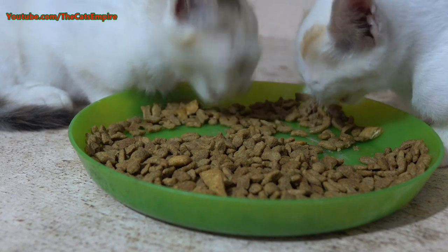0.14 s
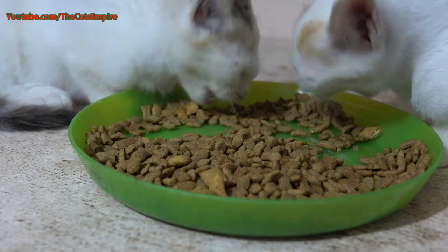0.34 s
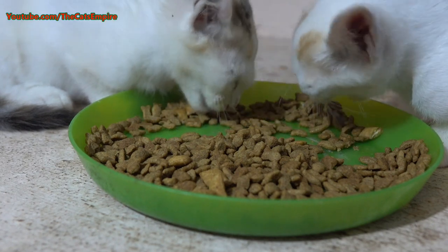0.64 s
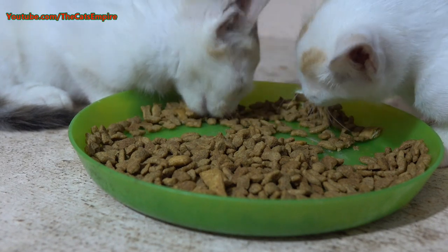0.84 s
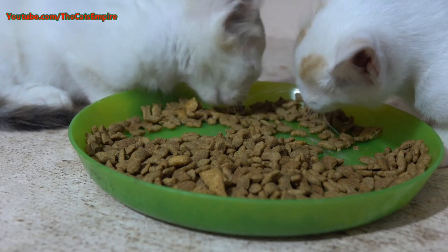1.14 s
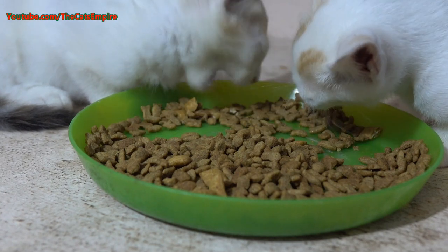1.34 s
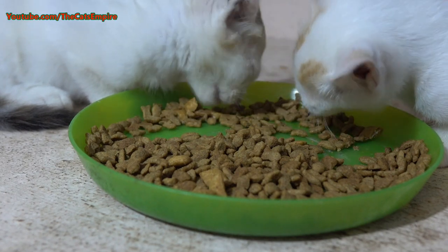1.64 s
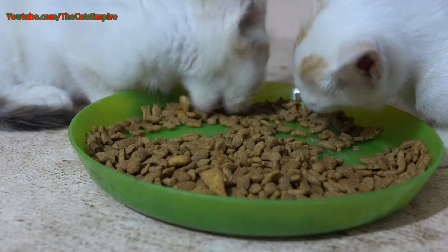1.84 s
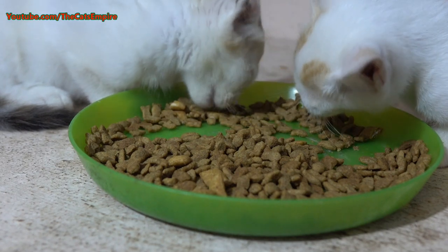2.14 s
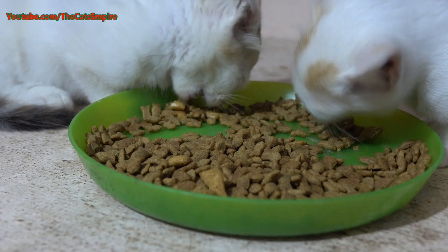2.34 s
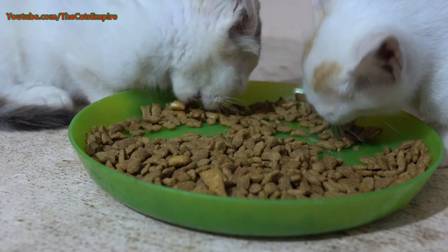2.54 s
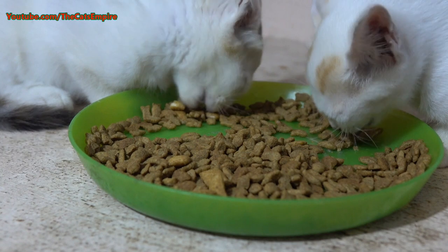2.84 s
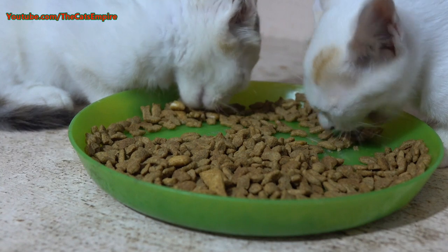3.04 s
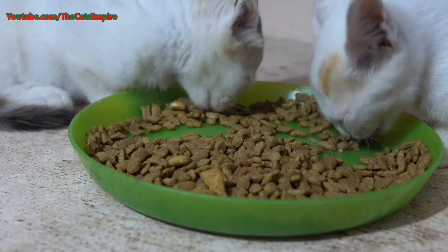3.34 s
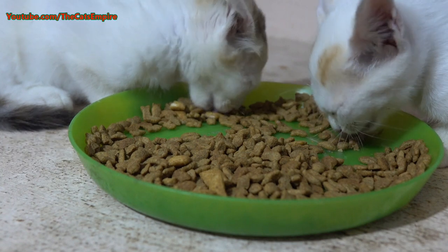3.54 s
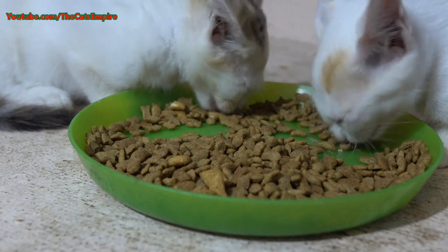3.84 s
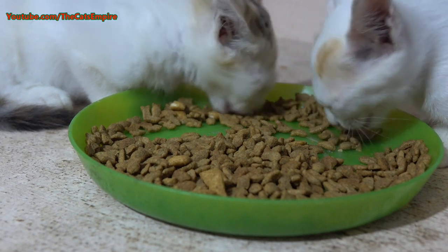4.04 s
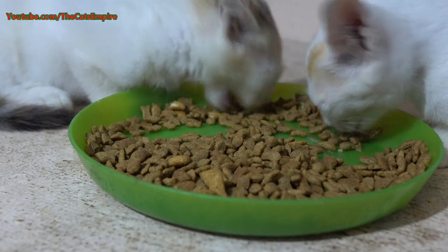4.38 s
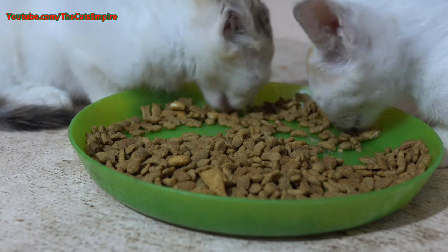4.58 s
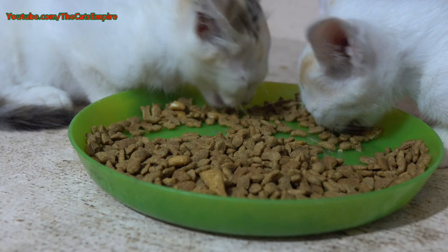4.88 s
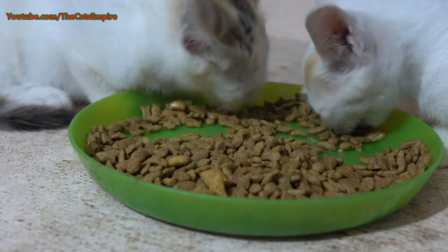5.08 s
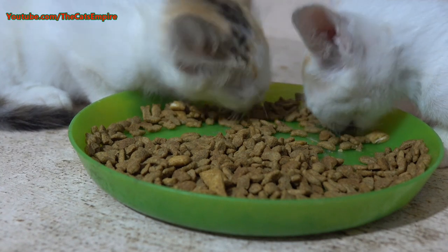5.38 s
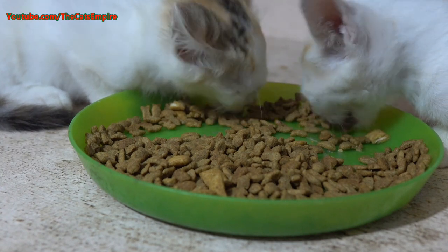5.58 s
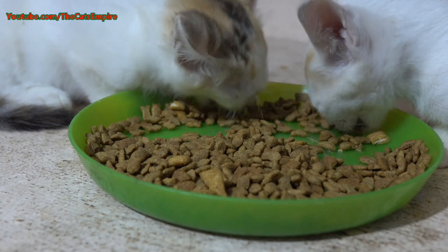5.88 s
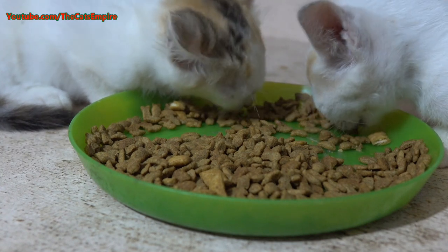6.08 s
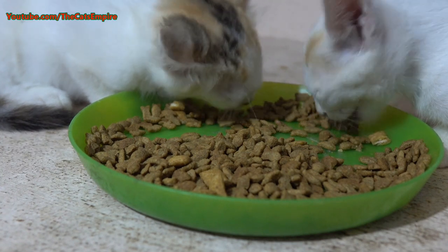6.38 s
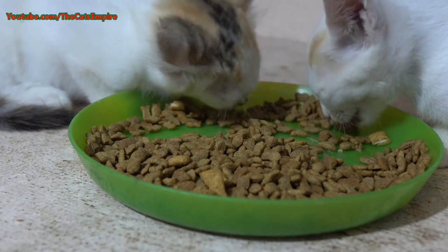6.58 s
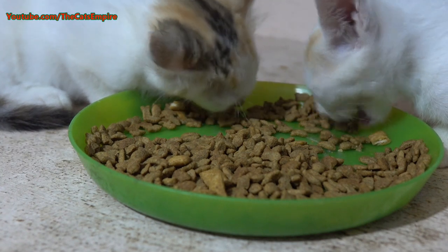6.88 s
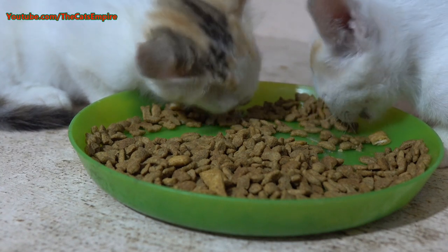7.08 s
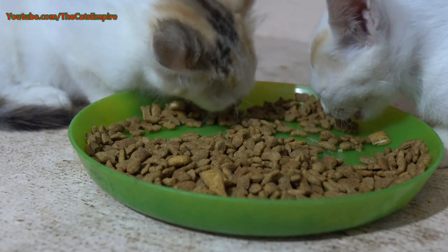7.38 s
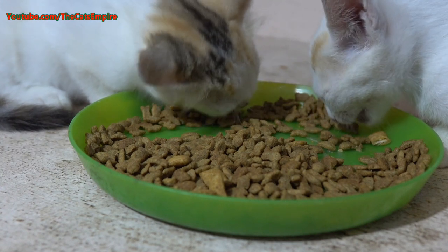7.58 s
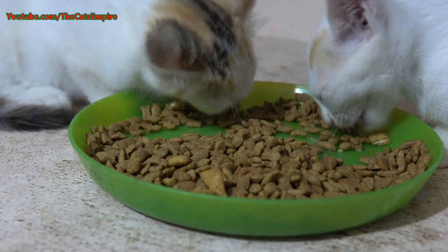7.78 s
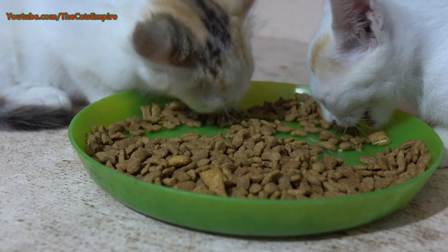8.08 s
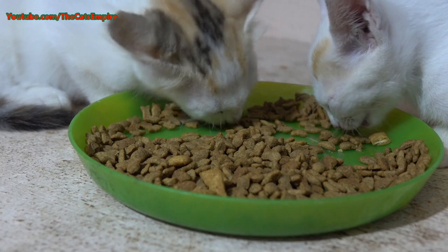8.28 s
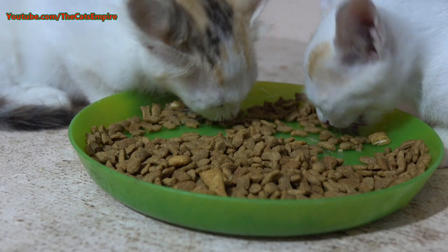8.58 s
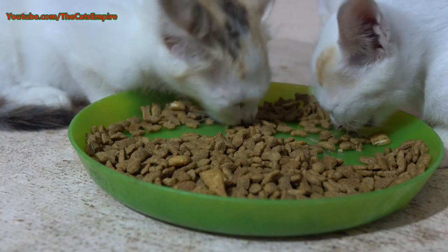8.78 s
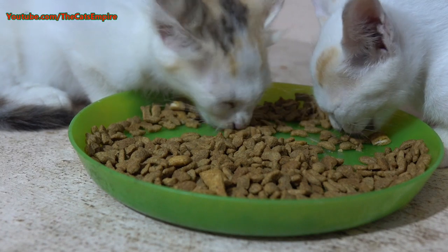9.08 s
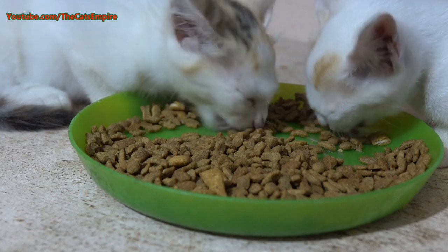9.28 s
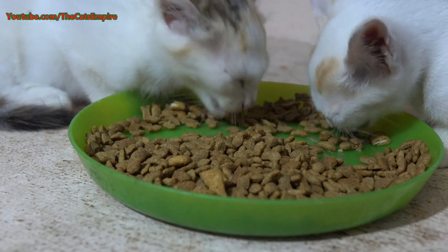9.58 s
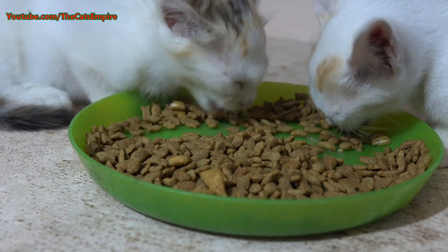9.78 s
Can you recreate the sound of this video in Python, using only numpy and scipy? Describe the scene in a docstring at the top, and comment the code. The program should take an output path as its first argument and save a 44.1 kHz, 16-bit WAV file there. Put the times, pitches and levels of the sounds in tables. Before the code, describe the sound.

Two kittens crunch dry pellets from a plastic plate very close up, brittle snaps and gritty chewing thinning out, then thickening at the end.

```python
"""Two kittens eat dry food from a plastic plate on a hard floor, close to the microphone.
From the start, chewing strokes grind crumbs as clumps of tiny ringing grains, lips smack in the treble,
bites set the plate's modes ringing and pellets snap as noise bursts that ring the mouth, over quiet room air.
Loud crunching thins out after three seconds; soft sagging bumps come from four seconds on; lone hard
snaps follow, then the densest crackle in the last second. A small hard room answers; peaks overload."""
import sys
import numpy as np
from scipy import signal
from scipy.fft import rfft, irfft
from scipy.io import wavfile

SR = 44100
rng = np.random.default_rng(int(sys.argv[2]) if len(sys.argv) > 2 else 0)


def unload_audio(sound):
    """Save the sound as a 16-bit wav file, at the path given as the first command line argument."""
    columns = np.transpose(np.atleast_2d(sound))
    # keep every value between -1 and 1, then stretch to whole-number steps
    steps = np.round(np.clip(columns, -1, 1) * 32767)
    wavfile.write(sys.argv[1], SR, steps.astype(np.int16))


def to_linear_factor(level_db):
    """Convert decibel levels (scalar or array-like) to linear amplitude factors."""
    exponent = np.asarray(level_db, float) / 20
    return 10 ** exponent


N = 437472   # samples

# Pellets that snap between the teeth. Each row: start in seconds, peak of the middle band in dB (before the
# mouth's colour), mouth ring in Hz, hollow body and treble in dB relative to the middle band.
SNAPS = [(0.067, -25, 3930, -25.5, -6), (0.096, -15, 1910, -17, 9), (0.13, -18, 6370, -38, 9.5),
         (0.18, -6, 3630, -4, -4), (0.202, 4, 3700, -5.5, 3.5), (0.2768, -13.5, 3380, -23, -21.5),
         (0.298, -5.5, 3500, -6.5, 0.5), (0.329, 2, 3500, -11.5, -2), (0.352, 3.5, 2200, -6, 5),
         (0.591, -25.5, 3950, -36, -0.5), (0.605, -10, 4530, -21, -7.5), (0.643, -12, 1204, -35, -35),
         (0.699, -16, 3950, 3.5, 0), (0.959, -17.5, 1830, -33.5, -24), (1.0081, 1.5, 3043, -7.5, -3.5),
         (1.03, -17, 3560, -20, -26), (1.221, -20.5, 3350, -23, -22.5), (1.235, -29.5, 3620, 4, -29.5),
         (1.264, -19.5, 3800, -1.5, 2.5), (1.286, -13.5, 3260, 0.5, 2.5), (1.332, -13.5, 1800, 0, -38.5),
         (1.37, 3.5, 3130, -7, 4), (1.421, -7, 3300, -0.5, 2), (1.484, 7, 3756, -15.5, -3.5),
         (1.494, -20, 3800, -15, 1.5), (1.674, -19.5, 5300, -1.5, -17), (1.7875, -6.5, 1180, -29, -7.5),
         (1.805, -8.5, 1300, -28.5, 2), (1.8164, -8, 1690, -19.5, -16.5), (1.83, -6, 3520, 5, 8),
         (1.882, -5, 2970, -4, 0.5), (1.89, -6.5, 3700, -31, -1), (1.91, 5, 3660, -11, -12.5),
         (2.056, -26, 3340, -8.5, -8), (2.106, -19.5, 1970, -26.5, 9.5), (2.135, -13, 4670, -5, -1),
         (2.151, -23, 3500, 1.5, -23), (2.186, -12.5, 2300, 3, -25), (2.241, 8, 3960, -10.5, -19.5),
         (2.2533, 5, 4130, -12.5, 0), (2.394, -18.5, 1980, -11.5, -15.5), (2.468, -16, 4170, -56, -5),
         (2.519, -22.5, 4870, -9, -0.5), (2.561, -25.5, 3840, -43, -12), (2.624, -28.5, 3400, -19, -16.5),
         (2.653, -21.5, 1820, 7, -4), (2.663, 2, 2950, -11.5, -2.5), (2.742, -8.5, 5240, 0, -33.5),
         (2.766, -13, 810, -29.5, -28.5), (2.784, -7, 3250, -0.5, 0), (2.9328, -12.5, 4330, -23.5, -16.5),
         (2.968, -11.5, 3060, -13, -23.5), (3.043, -6.5, 2910, 0, -18.5), (3.079, -16.5, 2760, -26, -21),
         (3.099, -20.5, 3080, -14, 5.5), (3.2308, 4.5, 2700, -3.5, 2.5), (3.328, -16.5, 3000, 0, 6.5),
         (3.477, -18.5, 3400, -21, -2), (3.494, -25, 4370, -8, 0.5), (3.524, -29, 2330, 0, -25),
         (3.584, -18, 4180, -12, -20.5), (3.594, -9.5, 4570, -6.5, -3), (3.634, -26, 3930, -33, 5),
         (3.713, -24, 4720, -41, -11), (3.735, -23, 4300, -5, -25), (3.763, -25, 4900, -3, -1),
         (3.7948, -23.5, 4460, -11, -3), (3.9211, -17, 4700, -17, -27), (3.972, -22, 2180, -28, -2),
         (4.055, -24.5, 3070, -3, -40.5), (4.138, -27.5, 2270, -25.5, -3), (4.184, -13, 934, -16, -36.5),
         (4.203, -26, 4800, -30, -23.5), (4.301, -18.5, 6440, -16, -15), (4.3133, -10.5, 6800, -9, -9),
         (4.327, -19.5, 2250, -31, 2), (4.757, -29, 1020, -15, -28), (4.901, -24, 5220, -39.5, -41),
         (4.955, -24.5, 3900, -6, -17.5), (4.977, -26.5, 4830, -12, -35), (5.162, -23.5, 2380, -6, -21),
         (5.215, -25.5, 3340, -11, -22), (5.224, -22, 3360, 5.5, -5), (5.258, -21, 2900, -25.5, -13.5),
         (5.266, -16, 1260, -44, -22), (5.291, -18.5, 6100, -43, -16.5), (5.358, -25.5, 3500, -5, -18.5),
         (5.543, -1, 3930, -6.5, -36), (5.563, -11, 3720, -4.5, 11.5), (5.641, -21, 2320, 2, -31),
         (5.667, -19, 3550, -25, -2.5), (5.678, -18, 1230, -32, -28), (5.834, -26.5, 3600, -29, -30.5),
         (5.892, -26.5, 2970, 0, 1), (5.955, -25.5, 4400, -28.5, -16), (5.978, -1.5, 3330, -11, 2),
         (6.195, -21, 3150, 1, -25), (6.3515, 9.5, 3250, -9, 2.5), (6.574, -16.5, 2680, -32, -25),
         (6.647, -16, 4060, -7, 12), (6.864, -24.5, 4400, -43.5, -11), (7.039, -19, 1920, 1.5, 0),
         (7.093, 7, 2780, -11.5, 3.5), (7.182, -18, 3480, -30, -20), (7.207, -12, 3140, -2.5, -9),
         (7.259, -15, 5400, -3, -23.5), (7.268, 2.5, 3020, -11.5, -11.5), (7.349, -26.5, 2920, -18, -13),
         (7.366, -26.5, 3300, -23, -10), (7.574, -27, 2470, 0.5, -7), (7.674, -24.5, 3250, -31, -13),
         (7.685, -17, 3160, -37, -19), (7.914, -19.5, 1235, -37, -23), (8.061, -23.5, 2240, 1, -37.5),
         (8.088, -16.5, 4400, 0.5, 0.5), (8.148, -27, 4560, -18, 1), (8.439, -22, 3220, -25, -30),
         (8.458, -29, 2010, -11, -33), (8.545, -23.5, 4150, -15, -33), (8.634, -27, 1095, -23, -32),
         (8.6488, -12, 3440, -3, -23), (8.672, 4.5, 2510, -13, -9.5), (8.849, -25, 1900, -17, -30),
         (8.895, -15.5, 1550, -20, -44), (8.9063, -12.5, 1280, -33, -7.5), (8.92, -7.5, 1420, -37, -6.5),
         (8.983, -17.5, 1730, -19, -8), (8.998, -21, 4100, -20, 1.5), (9.011, -16.5, 1450, -28, -6.5),
         (9.0692, -15.5, 2540, -1.5, -33), (9.09, -25.5, 2620, -27, -33), (9.127, -7.5, 2120, -31, -30),
         (9.138, -17.5, 2480, -28, -23.5), (9.152, -22, 2780, 4, -38), (9.171, -7.5, 2760, -1, -22),
         (9.207, -15.5, 3800, 4, 6), (9.2261, 3, 2500, -17.5, -16), (9.242, -5.5, 2390, -28, -11),
         (9.302, 1, 1390, -14, -7), (9.321, -5, 1950, -20, -4.5), (9.347, -2, 2900, 1, 1.5),
         (9.379, -8, 2270, -5, 1), (9.44, -5.5, 3560, -10, -10), (9.569, -15.5, 3060, -5.5, 6),
         (9.613, -15.5, 3100, 1, -9.5), (9.64, 0.5, 2930, -4.5, -22.5), (9.682, 3.5, 2450, -10, -1.5),
         (9.721, -10, 2560, -22.5, -26.5), (9.743, 6, 2010, -13, 0.5), (9.757, -12.5, 2090, -14, -5.5),
         (9.807, -10.5, 960, -63, -19.5), (9.862, -18.5, 2820, -29, 3)]
MOUTH_LOW_HZ = 800   # small mouths give off no bass


def rms_one(x):
    """Scales a signal to an rms of 1."""
    return x / np.sqrt(np.mean(x ** 2) + 1e-20)


def at_hz(points, hz):
    """Reads a table of (Hz, value) between its points on a logarithmic pitch scale."""
    table_hz, values = np.array(points)[:, 0], np.array(points)[:, 1]
    return np.interp(np.log(hz), np.log(table_hz), values)


def ring(clicks, hz, t60):
    """A two-pole resonator: a unit click sets a sine of height 1 ringing, 60 dB down after t60 seconds."""
    r, w = to_linear_factor(-60 / (t60 * SR)), 2 * np.pi * hz / SR
    return signal.lfilter([0, np.sin(w)], [1, -2 * r * np.cos(w), r * r], clicks + 1e-18)


def cut(x, hz, kind, order=2):
    """A Butterworth filter."""
    return signal.sosfilt(signal.butter(order, hz, kind, fs=SR, output="sos"), x)


def coloured(x, spectrum):
    """A short causal minimum-phase filter that follows a table of (Hz, dB)."""
    hz = np.linspace(0, SR / 2, 1025)
    cepstrum = irfft(at_hz(spectrum, np.maximum(hz, 1)) * np.log(10) / 20)
    cepstrum[1:1024] *= 2   # folding the cepstrum makes the filter causal
    cepstrum[1025:] = 0
    impulse = irfft(np.exp(rfft(cepstrum)))
    return signal.fftconvolve(x, impulse)[:len(x)]


def drift(rate):
    """Slow chance with spread 1: noise through two equal low-pass poles at rate Hz."""
    r = np.exp(-2 * np.pi * rate / SR)
    slow = signal.lfilter([1], [1, -2 * r, r * r], rng.standard_normal(N + SR))
    return rms_one(slow[SR:])


def air():
    """The quiet of the room: steady coloured noise with a few narrow wavering hisses."""
    # Spectrum of the quiet. Each row: frequency in Hz, relative density in dB per Hz.
    quiet = [(20, 1), (60, -13), (170, -21.5), (400, -18.5), (1000, -23), (2000, -23), (4500, -15),
             (6500, -27.5), (10000, -31), (13000, -38), (16000, -42.5)]
    # Faint narrow hisses. Each row: centre in Hz, width in Hz, level in dB about which it wavers.
    hisses = [(100, 24, -77), (1070, 150, -75), (3410, 300, -74), (4400, 500, -73), (7350, 350, -75.5),
              (12800, 900, -86)]
    level_db, waver_db, waver_hz = -59.5, 4.5, 4.1
    out = to_linear_factor(level_db) * rms_one(coloured(rng.standard_normal(N), quiet))
    for hz, width_hz, db in hisses:
        band = [hz - width_hz / 2, hz + width_hz / 2]
        hiss = rms_one(cut(rng.standard_normal(N), band, "band"))
        out += to_linear_factor(db + waver_db * drift(waver_hz)) * hiss
    return out


def jaw():
    """Level, mouth ring and wetness over time: strokes swell, hold and die; louder ones weigh more."""
    # Chewing strokes that grind crumbs. Each row: start in seconds, length in seconds, level in dB,
    # centre of the mouth's ring in Hz, wet treble in dB (lowered by a fixed trim in grinding).
    strokes = [(0.007, 0.14, -43.5, 2640, 0), (0.22, 0.21, -52.5, 3000, -15.5),
               (0.406, 0.11, -52, 2230, -1.5), (0.595, 0.1, -39.5, 2660, -12.5),
               (0.72, 0.028, -36.5, 1520, -19), (0.775, 0.21, -52.5, 1250, -12),
               (0.957, 0.062, -39, 2300, -9.5), (1.143, 0.48, -45, 2280, -13),
               (1.637, 0.046, -42, 3300, -1.5), (1.749, 0.16, -31.5, 2040, -8),
               (2.033, 0.08, -47.5, 3330, 3.5), (2.116, .09, -46, 2000, -18), (2.362, 0.033, -43, 3560, 2),
               (2.46, 0.091, -52.5, 3730, -4.5), (2.591, 0.29, -48.5, 2500, -8),
               (2.928, 0.023, -45, 3200, -4), (3.021, 0.11, -39, 2460, -7), (3.379, 0.038, -45, 2480, -7.5),
               (3.46, 0.06, -42.5, 2370, -6), (3.581, 0.029, -37, 1500, -27),
               (3.719, 0.092, -43, 3240, -13), (3.909, 0.077, -37.5, 3500, -7.5),
               (4.033, 0.16, -47.5, 2100, -11.5), (4.241, 0.014, -41.5, 3100, 0),
               (4.296, 0.12, -39.5, 2040, -15), (4.461, 0.048, -49, 2130, -13.5),
               (4.75, 0.077, -54, 1460, -28), (4.914, 0.066, -49, 3700, 7), (5.151, 0.025, -41, 2300, -18),
               (5.21, 0.051, -34.5, 2370, -9.5), (5.345, 0.037, -40, 2530, -16),
               (5.446, 0.059, -45.5, 2020, -23), (5.613, 0.097, -48, 1960, -8.5),
               (5.833, 0.13, -50.5, 3360, -11), (6.064, 0.081, -45.5, 3270, -7),
               (6.18, 0.17, -50.5, 3000, -12), (6.501, 0.088, -44.5, 4040, -1.5),
               (6.636, 0.069, -44.5, 2930, -5), (6.857, 0.029, -50, 3600, 6), (6.967, 0.015, -46, 3500, 1),
               (7.006, 0.06, -51, 2450, -16), (7.17, 0.11, -50.5, 2900, -10),
               (7.337, 0.022, -39, 2830, -2.5), (7.448, 0.022, -46.5, 2500, -11.5),
               (7.556, 0.019, -46, 2560, -7), (7.677, 0.044, -52.5, 2870, -23.5),
               (7.779, 0.023, -45.5, 3220, -27.5), (7.875, 0.25, -50.5, 1440, -37),
               (8.028, 0.13, -55.5, 3590, -8.5), (8.181, 0.15, -52.5, 2562, -8.5),
               (8.374, 0.11, -49.5, 2150, -19), (8.536, 0.044, -56.5, 3500, -29),
               (8.627, .05, -43.5, 2300, -40), (8.797, 0.04, -40, 1400, -14),
               (8.838, 0.057, -35, 1480, -19), (8.883, 0.055, -39.5, 1310, -34),
               (8.93, 0.055, -39.5, 1285, -20), (9.046, 0.024, -32, 1598, -29),
               (9.126, 0.26, -33, 1970, -18), (9.542, 0.11, -49.5, 3040, -6),
               (9.66, 0.06, -42.5, 2700, -13.5), (9.788, 0.095, -41, 1600, -11)]
    rise_db_per_s, fall_db_per_s = 1100, 428.5
    # every snapped pellet crumbles on, this far under its snap
    crumble_delay_s, crumble_s, crumble_db, crumble_wet_db = 0.004, 0.05, -42, -8.5
    crumbling = [(s + crumble_delay_s, crumble_s, db + crumble_db, hz, crumble_wet_db)
                 for s, db, hz, *_ in SNAPS]
    start, length, db, hz, wet_db = np.transpose(strokes + crumbling)[:, :, None]
    t = np.arange(0, N + 64, 64) / SR
    rising_db = rise_db_per_s * np.maximum(start - t, 0)
    falling_db = fall_db_per_s * np.maximum(t - start - length, 0)
    power = to_linear_factor(np.maximum(db - rising_db - falling_db, -200)) ** 2
    total = power.sum(axis=0)
    level_db = 10 * np.log10(total)
    centre_hz = (power * hz).sum(axis=0) / total
    wetness_db = (power * wet_db).sum(axis=0) / total
    return [np.interp(np.arange(N) / SR, t, control) for control in (level_db, centre_hz, wetness_db)]


def grinding():
    """Clumped tiny fractures each strike neighbouring pitches; the mouth favours those near its ring."""
    # Tone of the ground crumbs. Each row: frequency in Hz, gain in dB.
    crumb_tone = [(800, -8), (1100, -4.5), (2500, -14.5), (4300, -4.5), (6000, -6.5)]
    grains_per_s, size_db = 2800, 6.5
    clump_db, clump_hz = 5.5, 50
    cycles, neighbours, hiss_share = 6, 1.5, 0.36   # cycles to fall 60 dB, reach in pitch steps, share
    fall_below_db, fall_above_db = 3.0, 13   # per octave away from the mouth's ring
    shift_db, shift_hz = 5, 4.6
    wet_from_hz, wet_trim_db = 6500, -10.5
    level_db, centre_hz, wet_db = jaw()

    sizes = to_linear_factor(size_db * np.minimum(rng.exponential(1, N), 3)) * rng.choice([-1, 1], N)
    clumps = to_linear_factor(clump_db * drift(clump_hz))
    grains = rms_one(sizes * (rng.random(N) < grains_per_s * clumps / SR))
    pitches = np.geomspace(800, 14000, 20)
    dealt = rng.integers(0, 20, N)   # the pitch that each grain falls on
    soft = 2100.0 / centre_hz   # a nearly closed mouth rings low and smears soaked crumbs together
    out, power = 0, 0
    for k, hz in enumerate(pitches):
        struck = grains * (abs(dealt - k) < neighbours) / np.sqrt(2 * neighbours)
        smear = hiss_share * soft * np.sqrt(clumps / len(pitches)) * rng.standard_normal(N)
        once = ring(struck + smear, hz, cycles / hz)
        grain = rms_one(ring(once, hz, cycles / hz))   # rung twice: steep flanks
        octaves = np.log2(hz / centre_hz)
        distance_db = np.maximum(-fall_below_db * octaves, fall_above_db * octaves)
        # the moving tongue shifts the colour
        favour_db = at_hz(crumb_tone, hz) - distance_db + shift_db * drift(shift_hz)
        # the highest grains sound wet and follow the stroke's wetness instead
        favour = to_linear_factor(wet_db + wet_trim_db) if hz > wet_from_hz else to_linear_factor(favour_db)
        out = out + favour * grain
        power = power + favour ** 2
    return to_linear_factor(level_db) * out / np.sqrt(power)


def mouth(sounds):
    """Filters everything between the teeth by the mouth's colour and takes away the bass."""
    # Mouth, plate and microphone together. Each row: frequency in Hz, gain in dB.
    colour = [(600, -5), (1080, -8.5), (1450, -5), (2400, 2.5), (2950, 2.5), (3600, 4), (4500, 4.5),
              (6300, -2.5), (7450, 1.5), (9800, -3), (12000, -5), (14000, -5.5), (15300, -9),
              (16300, -28.5)]
    return cut(coloured(sounds, colour), MOUTH_LOW_HZ, "high", order=3)


def rim(meal):
    """The rim and the heap sing along with every crunch, as resonators driven by the meal."""
    # Each row: frequency in Hz, height in dB of the ring that a unit click starts, t60 in seconds.
    resonances = [(1170, -49, 0.07), (6850, -59, 0.008)]
    return sum(to_linear_factor(db) * ring(meal, hz, t60) for hz, db, t60 in resonances)


def room(x):
    """Dense noise echoes that die band by band, and a weaker tail with one decay for all bands."""
    # Decay of the hard room. Each row: frequency in Hz, t60 in seconds.
    decay = [(200, 1), (500, 0.077), (1000, 0.19), (2800, 0.026), (7300, 0.19), (14000, 0.021)]
    level_db, late_db, late_t60_s, first_wall_s = -11.5, -7.5, 0.14, 0.0024
    t = np.arange(SR // 2) / SR
    edges = 150 * 2. ** np.arange(0, 7, .5)   # half octaves in Hz
    echoes = 0
    for low, high in zip(edges, edges[1:]):
        dying = to_linear_factor(-60 * t / at_hz(decay, low)) + to_linear_factor(late_db - 60 * t / late_t60_s)
        band = cut(rng.standard_normal(len(t)), [low, min(high * 1.1, 17000)], "band")
        echoes = echoes + band * dying
    echoes = echoes * np.clip(t / first_wall_s, 0, 1)   # the echoes fade in over a moment
    return to_linear_factor(level_db) * signal.fftconvolve(x, echoes / np.linalg.norm(echoes))[:N]


def smacks():
    """Each wet smack of tongue and lips is a tiny puff of noise round a pitch in the high treble."""
    # Each row: start in seconds, peak in dB (before the mouth's colour), pitch in Hz.
    puffs = [(0.036, -23, 11400), (0.6838, -16.5, 9400), (1.6361, -24, 12800), (1.9964, -26.5, 9700),
             (2.5072, -28, 12820), (3.4626, -27.5, 11700), (4.208, -28, 11400), (5.0626, -30.5, 12800),
             (5.233, -27, 12000), (5.3889, -32, 12700), (5.4912, -19, 12500), (6.195, -27, 13900),
             (6.4811, -31, 12400), (6.974, -28, 11900), (8.195, -30, 12600), (8.9121, -17.5, 13200),
             (9.5042, -34, 9900)]
    length_ms, spread = 1.0, 1.1   # spread: band edges as a ratio to the pitch
    out, ms = np.zeros(N), np.arange(512) * 1000 / SR
    for (s, db, hz), noise in zip(puffs, rng.standard_normal((len(puffs), len(ms)))):
        puff = cut(noise * np.exp(-ms / length_ms), [hz / spread, hz * spread], "band")
        out[round(s * SR):][:len(ms)] += to_linear_factor(db) * puff / abs(puff).max()
    return out


def plate():
    """Each knock is a brief push that rings every mode of the plate, thuds the heap and shakes the floor."""
    # Bites that knock the plate. Each row: start in seconds, level in dB, how much the two lowest modes
    # are struck in dB, thump through the floor in dB (before the common thump gain).
    knocks = [(0.037, -56.5, -2.5, -5), (0.18, -35.5, -29, -17.5), (0.204, -27, -31, -44),
              (0.298, -33.5, -14, -13), (0.3514, -24, -10.5, -15.5), (0.696, -41, -15, -32),
              (1.0088, -35.5, -15, -10), (1.288, -40.5, -41, -21), (1.332, -37.5, -7.5, -26),
              (1.371, -28, -13.5, -20), (1.484, -32.5, -15, -18), (1.787, -45, -34, -26),
              (1.83, -36, -40, -22), (1.907, -38.5, -1.5, -25), (2.243, -30, -39, -45),
              (2.667, -32.5, -8, -45), (2.783, -36, -20, -45), (3.2311, -27, -5, -23.5),
              (4.758, -46, -8, -40), (5.542, -45, -17.5, -11), (5.978, -47.5, -26, -29),
              (6.3517, -23, -18.5, -14.5), (6.642, -45, -16, -14), (7.041, -47.5, -26, -23),
              (7.093, -22.5, -22, -15), (7.269, -29.5, -13.5, -25.5), (8.09, -47.5, -34.5, -42.5),
              (8.672, -35, -4, -51.5), (9.227, -31.5, -36, -21), (9.347, -23, -13, -27),
              (9.6415, -36, -24, -14), (9.681, -32, -4, -9), (9.743, -24, -12, -28)]
    # Modes of the plate. Each row: frequency in Hz, level in dB relative to the knock, t60 in seconds.
    modes = [(250, 9.5, 0.24), (239.7, -2.5, 0.4), (304.5, -11.5, 0.28), (435.3, -7, 0.16),
             (489.7, -9.5, 0.3), (544.4, 6, 0.044), (673, -7.5, 0.12), (705.5, -10, 0.13)]
    rattle_ms, strike_spread_db = 0.12, 3.5
    thump_ms, thump_gain_db = 36.0, 6
    dull_ms, dull_db = 38.8, -5.5
    s, db, lowest_db, floor_db = np.transpose(knocks)
    chance = rng.standard_normal((len(s), len(modes)))

    def shaken(strength_db, ms):
        """An envelope that jumps at every knock and dies exponentially."""
        pushes, fading = np.zeros(N), np.exp(-1000 / (ms * SR))
        pushes[(s * SR).astype(int)] = to_linear_factor(strength_db)
        return signal.lfilter([1], [1, -fading], pushes + 1e-18)

    low = rms_one(cut(rng.standard_normal(N), [18, 100], "band"))
    out = low * shaken(db + floor_db + thump_gain_db, thump_ms)
    # the heap deadens into a broad thud
    dull = rms_one(cut(rng.standard_normal(N), [160, 800], "band", order=3))
    out = out + dull * shaken(db + dull_db, dull_ms)
    for k, (hz, mode_db, t60) in enumerate(modes):
        # the two lowest modes follow the table, the others vary by chance
        strike_db = lowest_db if k < 2 else strike_spread_db * chance[:, k]
        rattle = shaken(db + mode_db + strike_db, rattle_ms)
        out = out + ring(rattle / (rattle_ms * SR / 1000), hz, t60)
    return out


def snaps():
    """Each pellet splits in a short burst of uneven fractures that rings the open mouth."""
    length_ms, longer_per_db, split_db = 1.434, 0.03, 3.0   # length at 0 dB
    spread, ring_share, ring_cycles = 1.403, 0.94, 10.0
    body_hz, treble_hz, wide_share, wider_per_db = 1500, 6200, 0.59, 0.74
    shard_share, shard_s = 0.39, 0.03
    linger_db, linger_ms, linger_cycles = -19.0, 19.3, 24
    size = 4096
    out, ms = np.zeros(N + size), np.arange(size) * 1000 / SR
    chance = rng.standard_normal((len(SNAPS), 2, size))
    # pitches of the fragments, relative to the ring
    shards = 2 ** rng.uniform(-0.41, 0.32, (len(SNAPS), 6))
    for (s, db, hz, body_db, treble_db), (noise, uneven), ratios in zip(SNAPS, chance, shards):
        length = length_ms * np.exp(longer_per_db * db)   # big pellets take longer to give way
        burst = noise * to_linear_factor(split_db * uneven) * np.exp(-ms / length)
        # most energy lies round the ring
        middle = rms_one(cut(burst, [hz / spread, hz * spread], "band"))
        middle = middle + ring_share * rms_one(ring(middle, hz, ring_cycles / hz))
        # big snaps are broader
        wide = rms_one(cut(burst, [body_hz, treble_hz], "band", order=3))
        middle = middle + wide_share * to_linear_factor(wider_per_db * db) * wide
        # the fragments ring on
        fragments = sum(ring(burst, hz * ratio, shard_s) for ratio in ratios)
        middle = middle + shard_share * rms_one(fragments)
        # falling crumbs keep the mouth's ring sounding
        rustle = ring(uneven * np.exp(-ms / linger_ms), hz, linger_cycles / hz)
        middle = middle / abs(middle).max() + to_linear_factor(linger_db) * rustle / abs(rustle).max()
        body = cut(burst, [MOUTH_LOW_HZ, body_hz], "band", order=3)
        treble = cut(burst, treble_hz, "high", order=3)
        at = round(s * SR)
        for part, part_db in ((middle, 0), (body, body_db), (treble, treble_db)):
            out[at:at + size] += to_linear_factor(db + part_db) * part / abs(part).max()
    return out[:N]


def ticks():
    """A single crumb cracks: one sharp broad burst of noise with a short ring."""
    # Each row: start in seconds, peak in dB (before the mouth's colour), pitch in Hz.
    cracks = [(0.104, -19.5, 1640), (0.3258, -6.5, 3530), (0.632, -30, 1180), (0.6523, -17, 1500),
              (0.6775, -32, 3700), (0.691, -22.5, 4930), (0.734, -26, 1100), (0.7402, -20, 2300),
              (0.976, -25.5, 1940), (1.244, -27.5, 3620), (1.2595, -12.5, 8200), (1.3427, -22, 1810),
              (1.3476, -23, 1980), (1.5837, -27.5, 4050), (1.734, -23.5, 1550), (1.7814, -11.5, 1120),
              (2.0682, -27, 3960), (2.0749, -29.5, 4350), (2.2059, -21, 3400), (2.3695, -33, 3445),
              (2.3869, -20.5, 4050), (2.545, -31.5, 4150), (2.6063, -26.5, 3490), (2.645, -25.5, 3340),
              (2.7808, -22, 3190), (2.9282, -21, 3000), (3.02, -16, 8000), (3.0278, -31, 2370),
              (3.1049, -15, 2800), (3.5089, -28, 4350), (3.7553, -29, 4220), (3.777, -38, 3880),
              (3.9282, -22, 3875), (3.9436, -19, 2410), (4.1983, -28, 3400), (4.2978, -22, 2290),
              (5.2343, -22.5, 2930), (5.2536, -29, 2840), (5.2677, -18, 3450), (5.2713, -22, 2500),
              (5.366, -27, 3530), (5.445, -35, 2970), (5.528, -18, 4650), (5.6804, -20.5, 2300),
              (5.899, -20.5, 4400), (5.9506, -27, 4130), (5.9959, -19, 3360), (6.0813, -29.5, 4500),
              (6.278, -30.5, 4520), (6.564, -27, 3400), (6.643, -14, 2850), (7.1778, -22, 3450),
              (7.1866, -24, 3445), (7.2126, -16, 3190), (7.794, -33, 3750), (7.9483, -27.5, 1180),
              (8.0698, -30, 4350), (8.8918, -26, 1100), (8.9138, -24, 3960), (8.929, -28, 1290),
              (9.118, -34, 3100), (9.2204, -6, 1210), (9.3533, 2, 6400), (9.5614, -16, 3760),
              (9.7139, -15, 2670)]
    length_ms, spread, ring_share, cycles = 0.26, 1.9, 0.99, 6.2
    out, ms = np.zeros(N), np.arange(512) * 1000 / SR
    for (s, db, hz), noise in zip(cracks, rng.standard_normal((len(cracks), len(ms)))):
        crack = rms_one(cut(noise * np.exp(-ms / length_ms), [hz / spread, hz * spread], "band"))
        crack = crack + ring_share * rms_one(ring(crack, hz, cycles / hz))
        out[round(s * SR):][:len(ms)] += to_linear_factor(db) * crack / abs(crack).max()
    return out


def thuds():
    """Padded thuds of paws, bodies and plate: a few uneven cycles of sine and noise, sagging in pitch."""
    # Each row: start in seconds, peak in dB, starting pitch in Hz.
    bumps = [(4.282, -43, 250), (5.21, -40, 134), (5.25, -41.5, 123), (5.575, -37, 145), (5.65, -46, 130),
             (8.54, -47.5, 327), (8.816, -31, 250), (9.138, -42.5, 139)]
    rough = 0.36   # share of noise
    out, t = np.zeros(N), np.arange(SR // 5) / SR
    for (s, db, hz), noise in zip(bumps, rng.standard_normal((len(bumps), len(t)))):
        sagging = np.sin(2 * np.pi * hz * t * (1 - 0.33 * t))
        shake = sagging + rough * rms_one(cut(noise, [hz / 1.25, hz * 1.67], "band"))
        thud = shake * t * np.exp(-t * hz / 2.0)
        out[round(s * SR):][:len(t)] += to_linear_factor(db) * thud / abs(thud).max()
    return out


def scene():
    """Sends all mouth sounds through mouth, rim and room, then adds plate, bumps and air."""
    meal = mouth(snaps() + grinding() + smacks() + ticks())
    meal = meal + rim(meal)
    return (meal + room(meal) + plate() + thuds() + air())[None]


def top_cut(x):
    """Nothing passes above the cut-off."""
    return signal.sosfilt(signal.butter(12, 16590, fs=SR, output="sos"), x)


def record(dry):
    """The loudest snaps hit the ceiling of the converter and are clipped."""
    overloaded = np.clip(dry, -1.0, 1.0)
    return top_cut(overloaded)


dry = scene()
out = record(dry)
unload_audio(out)
```